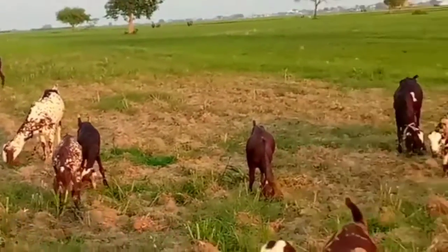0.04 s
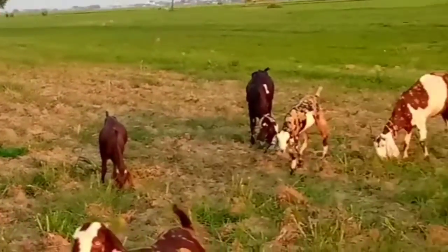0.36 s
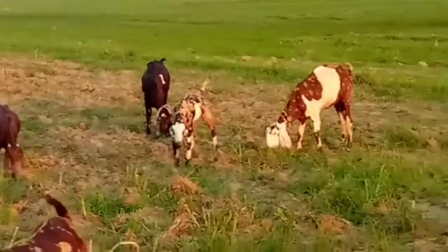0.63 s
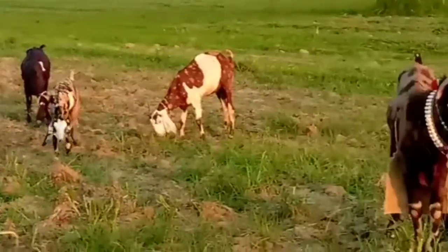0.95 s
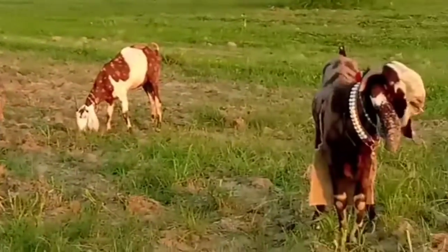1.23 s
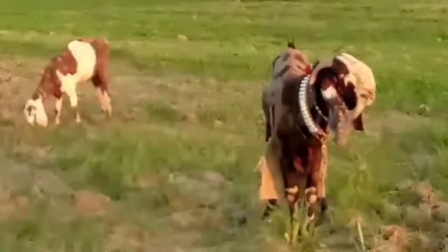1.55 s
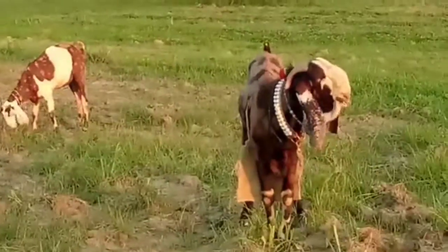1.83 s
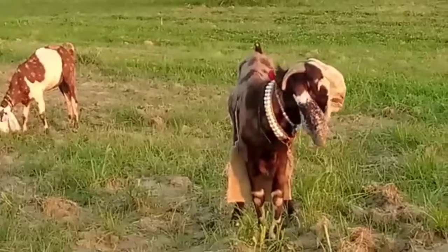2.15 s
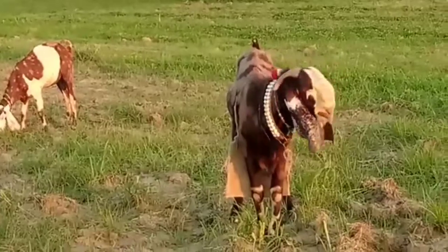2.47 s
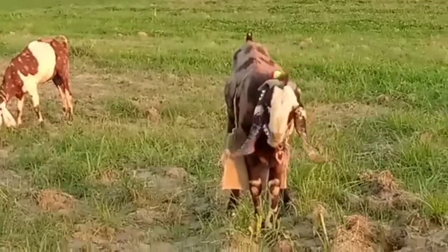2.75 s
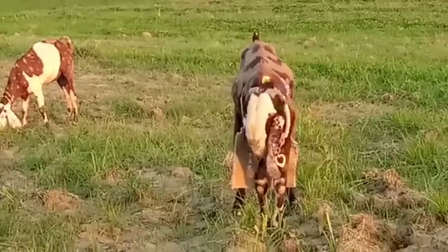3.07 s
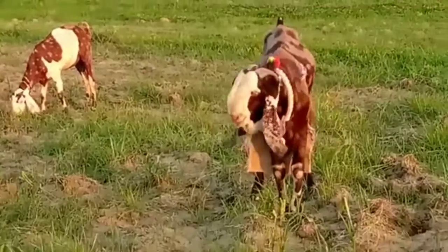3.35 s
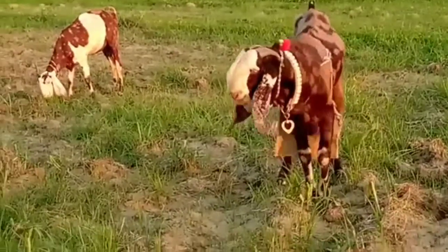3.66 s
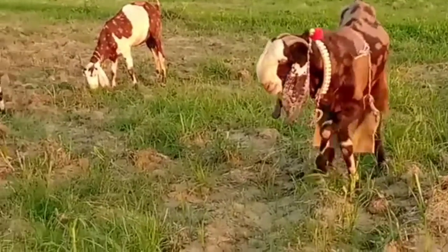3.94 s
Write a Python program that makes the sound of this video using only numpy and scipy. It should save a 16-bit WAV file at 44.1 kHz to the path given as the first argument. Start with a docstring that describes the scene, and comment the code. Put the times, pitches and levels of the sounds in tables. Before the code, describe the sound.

Small collar bells ping and clink irregularly as goats graze in an open field. An insect's fast, high ticking grows louder, with faint grass rips and distant bird whistles. Gusts of wind build, rumbling and thumping on the microphone.

```python
"""Goats graze in an open field. From the start, pellets ping and clink in their collar bells and grass rips,
over a light breeze and an insect's fast, high ticking. Far birds whistle at about 0.5, 1.6 and 2.3 s.
The insect grows louder near 1 s, and a neighbour briefly joins it. From 1.5 s the puffs of wind come
thicker and harder, their eddies thumping the microphone under the bells to the end."""
import sys
import numpy as np
from scipy import signal
from scipy.fft import rfft, irfft, next_fast_len
from scipy.io import wavfile
from scipy.ndimage import uniform_filter1d, map_coordinates

SR = 44100
rng = np.random.default_rng(int(sys.argv[2]) if len(sys.argv) > 2 else 0)


def transcribe(signal):
    """Save signal, clipped to [-1, 1], as a 16-bit WAV file at the path in sys.argv[1]."""
    frames = np.atleast_2d(signal).T
    limited = np.clip(frames, -1, 1)
    pcm = np.round(limited * 32767).astype(np.int16)
    wavfile.write(sys.argv[1], SR, pcm)


N = 176400

# Tone of the open air and of the distant bird chorus. Each row: frequency in Hz, gain in dB.
AIR_EQ = [(400, -4.5), (900, 4), (2600, -36), (4400, 9.5), (5800, -15), (8100, 10.5), (9800, -33),
          (15500, -23)]
CHORUS_EQ = [(600, -20), (900, -10), (1200, -4), (1600, 6), (2700, -17)]
# Swells of the chorus. Each row: time in seconds, level in dB.
CHORUS_LEVEL = [(0, -77), (.7, -75), (1.25, -73.5), (1.55, -86.5), (2.35, -75.5), (2.9, -86.5)]

# Two bird tunes. Each row: seconds into the call, pitch in Hz.
ARCHED_CALL = [(0, 1500), (0.172, 1488), (.24, 1692), (0.282, 1710), (.33, 1620), (.43, 1313)]
RISING_CALL = [(0, 2560), (0.077, 2950), (0.268, 3300)]
# Bird cues. Each row: start in seconds, tune.
BIRD_CUES = [(.545, ARCHED_CALL), (1.625, RISING_CALL), (2.285, ARCHED_CALL)]

# Partials of one insect tick. Each row: frequency ratio, gain in dB.
TICK_PARTIALS = [(0.9875, -2.5), (1.44, -18)]
# Fader for both insects. Each row: time in seconds, level in dB.
INSECT_LEVEL = [(0, -66), (.6, -69.5), (1.1, -57.5), (4, -54.5)]
# The neighbour's turns. Each row: start and end in seconds; silent if the end comes first.
NEIGHBOUR_CUES = [(1.0, 1.02), (1.54, 1.62), (2.43, 1.9)]

# Rips of grass. Each row: centre in seconds, half-width in seconds, level in dB.
TEARS = [(0.09, 0.0024, -57), (0.563, .004, -65), (0.575, 0.024, -60.5), (0.814, 0.0029, -62.5),
         (1.336, 0.0043, -60.5), (1.887, 0.041, -61.5), (2.244, 0.061, -68), (2.973, 0.0072, -62.5),
         (3.374, 0.003, -50)]
# Tone of the grass. Each row: frequency in Hz, gain in dB.
GRASS_EQ = [(1000, 7.5), (2800, 3), (4500, 14.5), (6800, 15.5), (9500, 2.5), (15500, 5)]

# The breeze between puffs. Each row: time in seconds, level in dB.
BREEZE_LEVEL = [(0, -51), (.95, -48.5), (1.28, -60.5), (1.45, -49.5), (2.1, -45.5), (3.1, -41), (4, -38.5)]
# Puffs of wind. Each row: start in seconds, hold in seconds, level in dB.
PUFFS = [(.318, 0.03, -34.5), (0.373, 0.16, -43), (0.685, 0.027, -39), (1.065, .11, -40.5),
         (1.489, 0.04, -35), (1.556, 0.043, -33.5), (1.768, 0.022, -30.5), (1.996, 0.033, -28),
         (2.314, 0.15, -33), (2.535, .12, -32), (2.734, 0.045, -25), (2.81, 0.076, -31.5),
         (3.143, .125, -26.5), (3.294, 0.018, -27), (3.382, 0.054, -25.5), (3.611, 0.1, -27.5),
         (3.741, 0.097, -28.5), (3.868, .022, -24.5), (3.938, 0.038, -24.5)]
# Single eddies hitting the microphone. Each row: time in seconds, level in dB before the low cut.
THUMPS = [(.34, -31), (0.701, -40), (1.498, -22.5), (1.605, -23), (1.791, -21.5), (2.353, -23),
          (2.443, -20), (2.49, -15), (2.739, -15), (3.228, -17.5), (3.392, -16), (3.505, -12),
          (3.881, -15.5)]
# Tone of the rumble at speed 1 and of the wind's fine crackle. Each row: frequency in Hz, gain in dB.
EDDY_EQ = [(20, -14.5), (90, 7), (250, 0), (450, -16.5), (700, -33), (1100, -63), (1800, -80),
           (4000, -111.5)]
CRACKLE_EQ = [(1200, -2.5), (2600, -11.5), (15000, -10)]

# Modes of each bell; the choked one lies against the collar: its main modes die at once in a clink, while a
# thin mode near 5 kHz rings on. Each row: frequency in Hz, gain in dB, seconds to fall 60 dB.
BELL_MODES = { "high": [(4128, 0, .115), (7540, -27, .13), (8025, -23, .16), (11910, -28, .12)],
              "middle": [(3840, 0, .15), (4620, -14, .12), (8625, -17, .15)], "low": [(3337, 0, .085),
              (11130, -29, .1)], "choked": [(3560, 0, .022), (3670, -1, .026), (4986, -20, .22),
              (5305, -28, .17), (6880, -24, .14), (8605, -23, .12), (9330, -28, .1), (10835, -25, .08)]}
# Pellet strikes on each bell. Each row: start in seconds, level in dB.
STRIKES = { "high": [(.02, -46), (.303, -50), (.604, -44.5), (.783, -52), (1.613, -48.5), (1.912, -52),
           (2.166, -44), (2.389, -49), (2.691, -46.5), (2.772, -49.5), (2.827, -37.5), (2.899, -50),
           (3.108, -52), (3.464, -46)], "middle": [(1.642, -56.5), (2.104, -52.5), (3.005, -57),
           (3.265, -60.5)], "low": [(.74, -51), (1.328, -53.5), (1.605, -49.5), (1.771, -50),
           (2.232, -53.5)], "choked": [(.089, -50), (.137, -47), (.303, -39), (.513, -43), (.586, -47),
           (.684, -48.5), (.814, -43.5), (.868, -42.5), (.919, -51), (1.085, -49.5), (1.491, -46.5),
           (1.725, -45.5), (1.895, -51), (1.964, -48), (2.055, -53.5), (2.431, -43.5), (3.14, -45),
           (3.354, -51), (3.688, -47), (3.98, -37)]}
# Tone of the pellet skidding in the shell. Each row: frequency in Hz, gain in dB.
SCRAPE_EQ = [(2900, -31.5), (3600, 1.5), (6000, -13), (15000, -20.5)]

AIR_DB, BIRD_DB, RUSTLE_DB, JIGGLE_DB = -72.5, -69.5, -80, -55
ECHO_SEND_DB, ECHO_T60_S = -5.5, .4
TICKS_PER_S, TICK_LIMP, TICK_JITTER_S = 36, .14, .00062  # the limp swings the ticks into pairs
TICK_HZ, TICK_FALL_HZ_PER_S, TICK_WIDTH_S = 8676, 128000, .0019
PUFF_RISE_S, PUFF_FALL_S, THUMP_WIDTH_S = .0051, .013, .0012
WIND_DB_PER_OCTAVE, FLUTTER_DB, LOW_CUT_HZ, CRACKLE_DB = 17, 2, 65.2, -43.5
BELL_ATTACK_S, MODE_SPREAD_DB, CLICK_DB, CLICK_T60_S = .00095, 4.5, -11, .03
REBOUND_S, REBOUND_DB = .0071, -12
TOP_HZ = 15850


def amp(db):
    """Decibels to gain."""
    return 10 ** (np.asarray(db) / 20)


def unit(x):
    """Scale to rms 1."""
    return x / np.sqrt(np.mean(x ** 2) + 1e-20)


def curve(rows):
    """An automation lane: (seconds, value) points as one value per sample."""
    return np.interp(np.arange(N) / SR, *np.transpose(rows))


def wobble(rate):
    """A smooth random curve, rate knots a second."""
    return map_coordinates(rng.standard_normal(2048), [np.arange(N) * rate / SR], mode="wrap")


def noise(eq, size=N):
    """Noise of rms 1 coloured by (Hz, dB) points."""
    hz, db = np.transpose(eq)
    gain = amp(np.interp(np.log(np.fft.rfftfreq(size, 1 / SR) + 1), np.log(hz), db))
    return unit(irfft(rfft(rng.standard_normal(size)) * gain, size))


def add(out, start, sound):
    """Mix a sound in at a time in seconds."""
    i = int(np.clip(round(start * SR), 0, N))
    out[i:i + len(sound)] += sound[:N - i]


def field():
    """The bed: near-steady air with a high hiss, and a swelling haze of distant birds."""
    air = amp(AIR_DB + wobble(17)) * noise(AIR_EQ)
    chorus = amp(curve(CHORUS_LEVEL) + 2.4 * wobble(8.64)) * noise(CHORUS_EQ)
    return air + chorus


def birds():
    """Far whistles with a slight waver, blurred by the field's echo."""
    calls = np.zeros(N)
    for start, tune in BIRD_CUES:
        when, hz = np.transpose(tune)
        t = np.arange(int(when[-1] * SR)) / SR
        pitch = np.interp(t, when, hz) * (1 + .0097 * wobble(121.7)[:len(t)])
        whistle = np.sin(2 * np.pi * np.cumsum(pitch) / SR)
        add(calls, start, amp(BIRD_DB) * signal.windows.tukey(len(t), 1 / np.pi) * whistle)
    t = np.arange(SR // 2) / SR
    tail = rng.standard_normal(len(t)) * amp(-60 * t / ECHO_T60_S)
    echo = signal.fftconvolve(calls, tail / np.linalg.norm(tail))[:N]
    return calls + amp(ECHO_SEND_DB) * echo


def insect(start, end):
    """A limping train of wing strokes, each a tiny falling chirp."""
    t = np.arange(-SR // 100, SR // 100) / SR
    phase = 2 * np.pi * (TICK_HZ * t - TICK_FALL_HZ_PER_S * t * t / 2)
    chirp = sum(amp(db) * np.sin(ratio * phase) for ratio, db in TICK_PARTIALS)
    tick = np.exp(-(t / TICK_WIDTH_S) ** 2 / 2) * chirp
    out = np.zeros(N)
    for k, (late, accent_db) in enumerate(rng.standard_normal(size=(200, 2))):
        when = start + (k + TICK_LIMP * (-1) ** k) / TICKS_PER_S + TICK_JITTER_S * late
        if when < end:
            add(out, when, amp(accent_db) * tick)
    return out * amp(curve(INSECT_LEVEL))


def grazing():
    """Short crackly rips of grass over the uneven rustle of the herd."""
    t = np.arange(N) / SR
    rips = sum(amp(db) * np.exp(-2 * ((t - centre) / width) ** 2) for centre, width, db in TEARS)
    rustle = amp(RUSTLE_DB + 2.8 * wobble(9.8))
    crunch = unit(noise(GRASS_EQ) * amp(5.5 * wobble(500)))
    return np.hypot(rips, rustle) * crunch


def thump(width):
    """The push and pull of one eddy passing the microphone, centred in a soft window."""
    u = np.arange(-SR // 50, SR // 50) / SR / width
    push = -u / (1 + u * u) ** 2
    return push / push.max() * np.hanning(len(u))


def wind():
    """Eddies buffet the microphone: a stronger puff carries them faster, so it is louder and brighter."""
    t = np.arange(N) / SR
    power = amp(curve(BREEZE_LEVEL)) ** 2
    for start, hold, db in PUFFS:
        attack = np.clip((t - start) / PUFF_RISE_S + .5, 0, 1)
        release = np.exp(-np.maximum(t - start - hold, 0) / PUFF_FALL_S)
        power += (amp(db) * attack * release) ** 2
    level_db = 10 * np.log10(power) + FLUTTER_DB * wobble(90)
    speed = 2 ** ((level_db + 30) / WIND_DB_PER_OCTAVE)  # varispeed: 1 at -30 dB
    eddies = noise(EDDY_EQ, size=2 * N)
    eddies /= np.sqrt(np.abs(uniform_filter1d(eddies ** 2, size=1100)))  # even out the level
    pressure = amp(level_db) * map_coordinates(eddies, [np.cumsum(speed)], mode="wrap")
    thumps = [(when, db, THUMP_WIDTH_S) for when, db in THUMPS]
    jabs = [(i / SR, level_db[i] + 2 * rng.normal(), THUMP_WIDTH_S / speed[i])
            for i in rng.integers(N, size=170)]
    for when, db, width in thumps + jabs:
        push = thump(width)
        add(pressure, when - len(push) / SR / 2, amp(db) * push)
    crackle = amp(CRACKLE_DB) * np.abs(pressure) * noise(CRACKLE_EQ)
    low_cut = signal.butter(3, LOW_CUT_HZ, "high", fs=SR, output="sos")
    return signal.sosfilt(low_cut, pressure) + crackle


def ping(modes):
    """One contact of the pellet: a short click, and the shell's modes ring in a fresh balance."""
    t = np.arange(SR // 4) / SR
    tone = np.zeros(len(t))
    for k, (hz, db, t60) in enumerate(modes):
        spread_db = MODE_SPREAD_DB * rng.normal() * (k > 0)
        tone += amp(db + spread_db - 60 * t / t60) * np.sin(2 * np.pi * (hz * t + rng.random()))
    click = amp(CLICK_DB - 60 * t / CLICK_T60_S) * noise(SCRAPE_EQ, size=len(t))
    return tone * (1 - np.exp(-t / BELL_ATTACK_S)) + click


def bells():
    """Collar bells: the pellet strikes and rebounds three times; all but the low bell also jiggle."""
    out = np.zeros(N)
    for name, modes in BELL_MODES.items():
        for start, db in STRIKES[name]:
            add(out, start, amp(db) * ping(modes))
            rebounds = np.cumsum(REBOUND_S * (.5 + rng.random(size=3)))
            for k, delay in enumerate(rebounds):
                add(out, start + delay, amp(db + REBOUND_DB) / (k + 1) * ping(modes))
    for name in ("high", "middle", "middle", "choked", "choked"):
        jiggles = rng.random(size=(22, 2))
        for k, (late, softness) in enumerate(jiggles):
            start = (k + late) * N / SR / len(jiggles)
            add(out, start, amp(JIGGLE_DB - 20 * softness) * ping(BELL_MODES[name]))
    return out


def scene():
    """The mono mix, everything at one microphone."""
    insects = insect(0, N / SR) + sum(insect(start, end) for start, end in NEIGHBOUR_CUES)
    return (bells() + wind() + grazing() + insects + birds() + field())[None]


def record(dry):
    """A tiny fade at each end and a brick-wall cut above TOP_HZ."""
    size = next_fast_len(N + SR // 2)
    fade = signal.windows.tukey(N, .002)
    passband = np.fft.rfftfreq(size, 1 / SR) < TOP_HZ
    return irfft(rfft(dry * fade, size) * passband, size)[..., :N]


dry = scene()
out = record(dry)
transcribe(out)
```